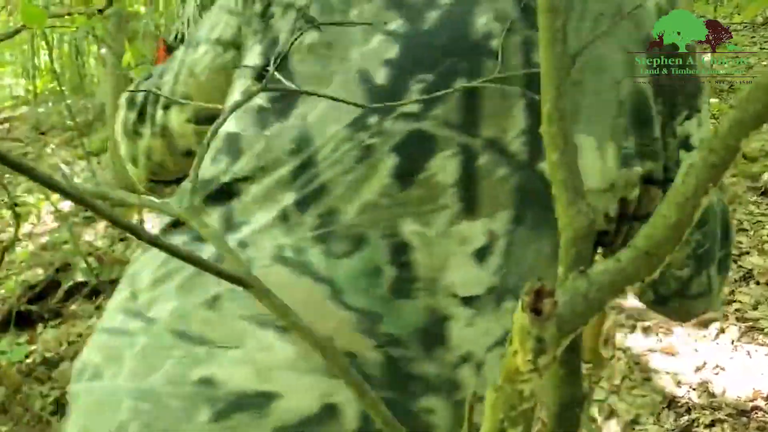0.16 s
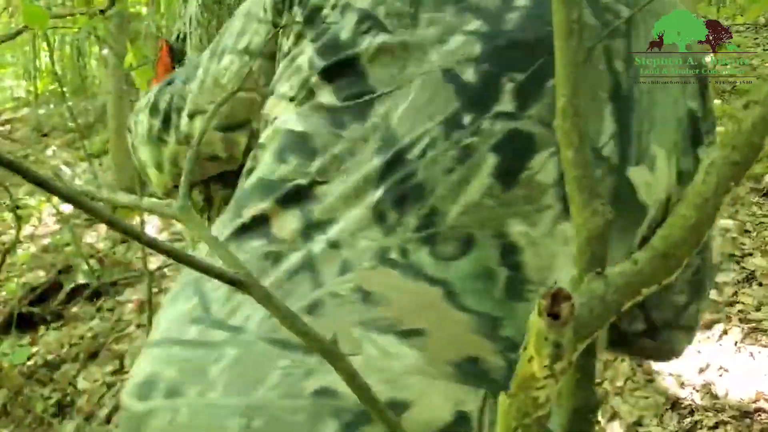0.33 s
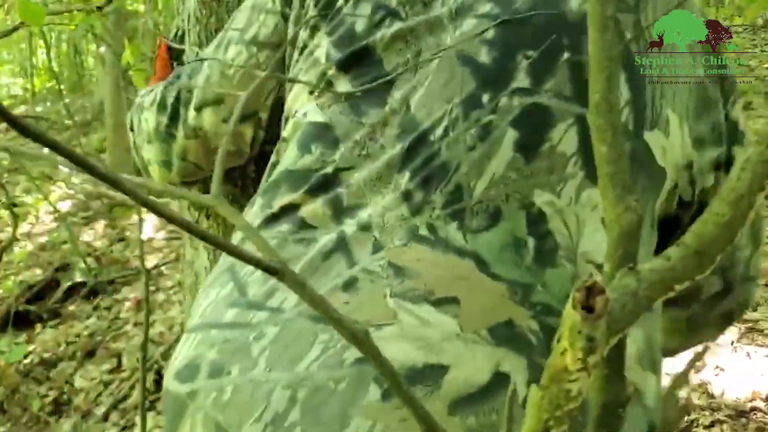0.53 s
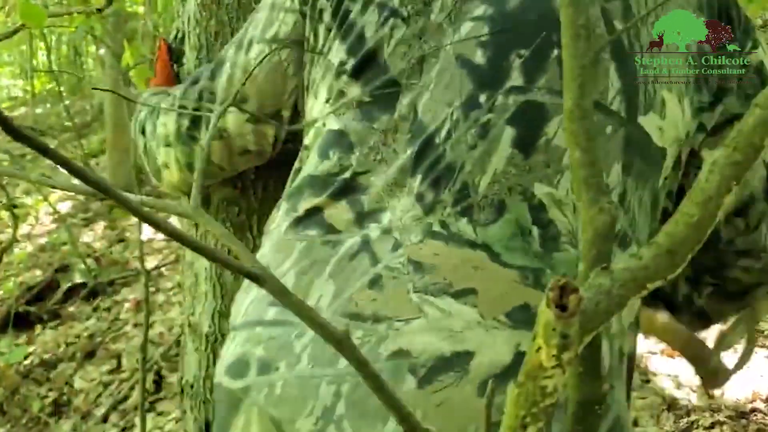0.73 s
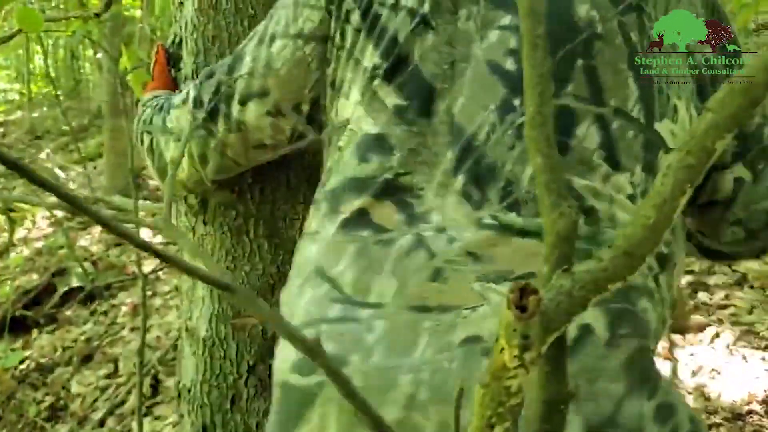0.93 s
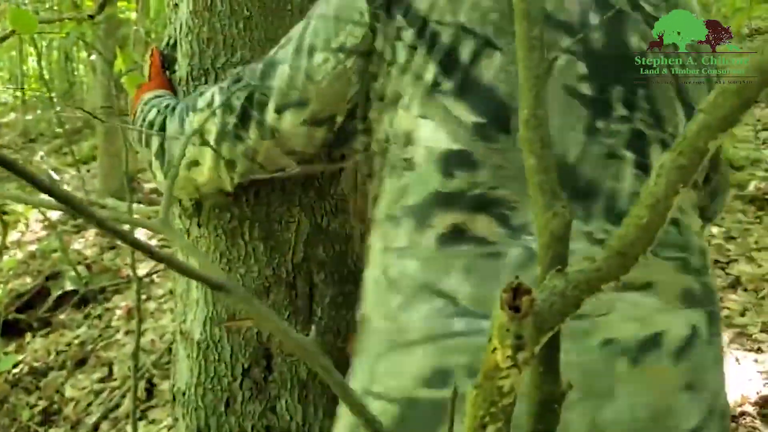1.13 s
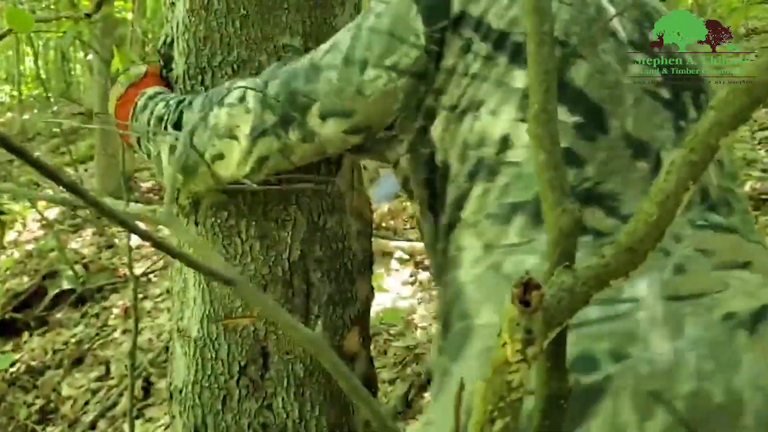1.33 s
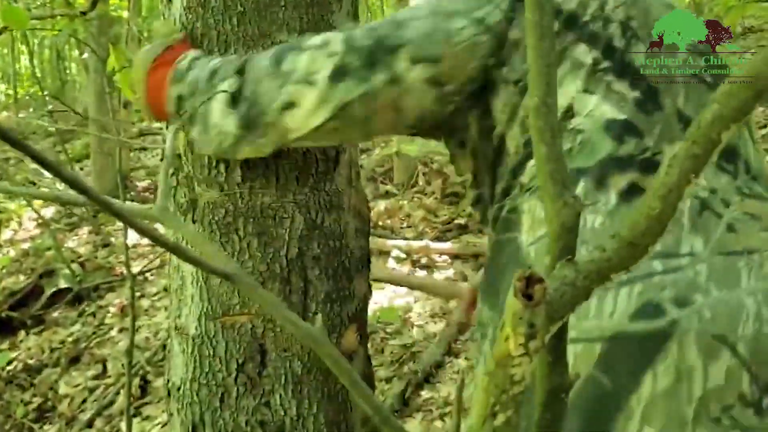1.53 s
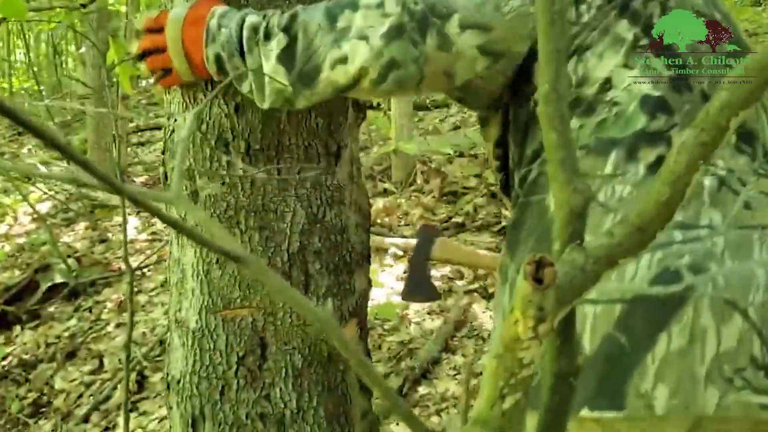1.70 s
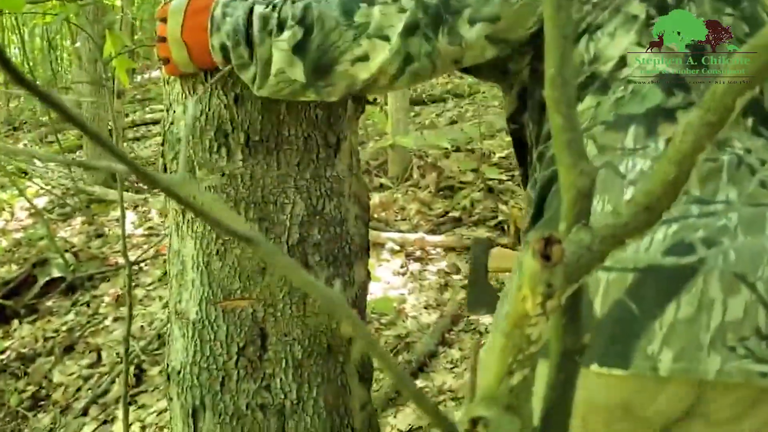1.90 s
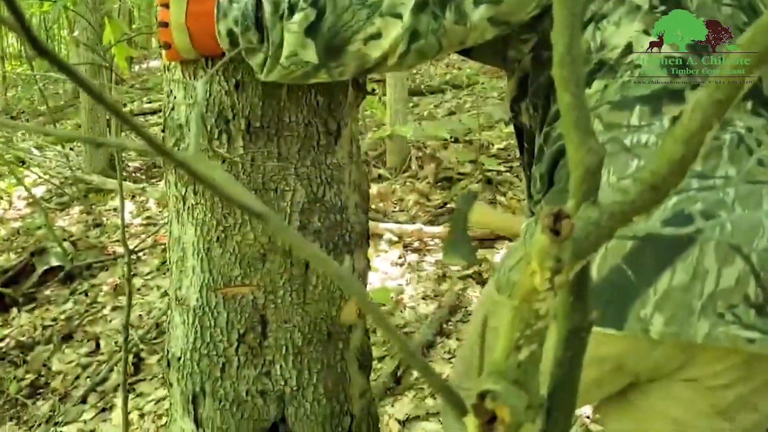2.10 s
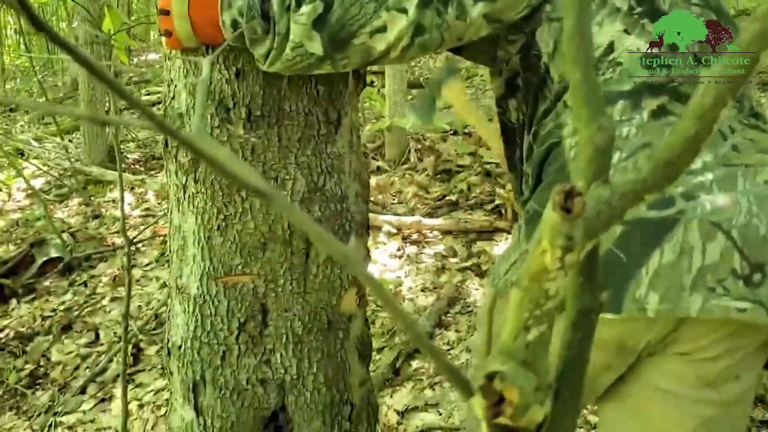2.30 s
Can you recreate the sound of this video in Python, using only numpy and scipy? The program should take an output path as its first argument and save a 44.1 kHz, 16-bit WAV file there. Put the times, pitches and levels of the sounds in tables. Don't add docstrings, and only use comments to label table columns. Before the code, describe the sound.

Hatchet chops into a trunk, slightly right: a splintery blow with a faint steel ring near 0.56 s, and a harder, tighter woody crack near 1.54 s, each with a low thump and short woodland echo. Dry leaves crackle underfoot, snapping sharply around 0.7 s, thinning near 1 s, flaring at 1.2 and 1.9-2.1 s, then fading. A dull wood knock comes at 1.42 s over faint forest hiss.

```python
import sys
import numpy as np
from scipy import signal
from scipy.fft import rfft, irfft, next_fast_len
from scipy.io import wavfile
from scipy.ndimage import uniform_filter1d, map_coordinates

SR = 44100
rng = np.random.default_rng(int(sys.argv[2]) if len(sys.argv) > 2 else 0)


def rack_gain(trim_db):
    fader = np.asarray(trim_db, float)
    return 10 ** (fader / 20)


def digitize_waveform(pressure):
    field = np.atleast_2d(pressure).T
    bounded = np.clip(field, -1, 1)
    quanta = np.round(bounded * 32767).astype(np.int16)
    wavfile.write(sys.argv[1], SR, quanta)


N = 103635


def unit(x):
    return x / np.sqrt(np.mean(x ** 2) + 1e-20)


def along(points, hz):
    f, v = np.transpose(points)
    return np.interp(np.log(hz + 1), np.log(f + 1), v)


def wobble(rate):
    knots = rng.standard_normal(int(N * rate / SR) + 4)
    return map_coordinates(knots, [np.arange(N) * rate / SR])


def noise():
    return rng.standard_normal((2, N))


def filtered(x, response):
    m = next_fast_len(N + 8192)
    return irfft(rfft(x, m) * response(np.fft.rfftfreq(m, 1 / SR)), m)[..., :N]


def spread(pair, spectrum):
    # (f/Hz, correlation/1)
    likeness = [(60, 0.7), (180, 0.97), (550, 0.86), (1650, 0.12), (4970, 0.16), (15000, -0.19)]

    def mid_side(hz):
        turn = np.arccos(np.clip(along(likeness, hz), 0, 1)) / 2
        return rack_gain(along(spectrum, hz)) * [np.cos(turn), np.sin(turn)]

    mid, side = filtered(pair, mid_side)
    return unit(np.array([mid + side, mid - side]))


def add(track, s, sound):
    part = track[..., round(s * SR):][..., :sound.shape[-1]]
    part += sound[..., :part.shape[-1]]


def onset(t, rise_s):
    return 1 - np.exp(-t / rise_s)


def ring(t, hz, t60, rise_s):
    return np.sin(2 * np.pi * hz * t) * rack_gain(-60 * t / t60) * onset(t, rise_s)


def swells(rows):
    t = np.arange(N) / SR
    gain = 0
    for at, db, rise, fall in rows:
        slope_db = np.where(t < at, 20 * (t - at) / rise, -60 * (t - at) / fall)
        gain = gain + rack_gain(db + slope_db)
    return gain


def forest_air():
    # (f/Hz, density/dB)
    air_colour = [(24, -39.5), (40, 0), (802, -29), (909, -11), (1460, -27), (3010, 10), (5490, -25),
                  (14500, -16), (15700, 6)]
    return rack_gain(-66 + 1.6 * wobble(15.0)) * spread(noise(), air_colour)


def cracks():
    grains_per_s, spread_db, grain_db, patch_db = 2500, 6.5, -3.5, 2.13
    draw = rng.random((2, N, 2))
    strength = rack_gain(-spread_db * np.log(draw[..., 1] + 0.015))
    starts = (draw[..., 0] < grains_per_s / SR) * strength
    grains = signal.lfilter([1], [1, -.9], starts) * noise()
    z = signal.stft(noise() + rack_gain(grain_db) * unit(grains), nperseg=256)[2]
    patches = uniform_filter1d(rng.standard_normal(z.shape[1:]), size=4, axis=0)
    patches = uniform_filter1d(patches, size=8, axis=1)
    return signal.istft(z * rack_gain(patch_db * unit(patches)), nperseg=256)[1][:, :N]


def leaves():
    # (t/s, leaf strength/dB, weight on the ground/dB, crispness/dB)
    shuffle = [(0, -36.5, -1, 2.5), (0.329, -32, -1, -12), (.41, -25.5, -3, 3.5), (.46, -38, 2.5, 2.5),
               (.57, -24.5, -3, -1.5), (.62, -31.5, -4.5, -2), (.72, -33.5, -6.5, -3),
               (0.821, -45, -5.5, -5), (1.168, -50.5, 2, -2), (1.199, -22.5, 2.5, -3.5),
               (1.339, -34, -2, -2.5), (1.56, -27.5, -3, -4), (1.71, -32.5, -3.5, -2), (1.88, -29, 2, 1),
               (2.001, -23, -5.5, -2), (2.142, -41, 3, -3), (2.23, -44, -3, -1.5), (2.31, -52.5, -1.5, -8)]
    # (t/s, level/dB, rise/s, fall t60/s)
    crushes = [(.15, -30, 0.005, 0.027), (0.21, -30.5, 0.02, 0.12), (.41, -44, 0.016, 0.097),
               (0.66, -28.5, 0.012, 0.19), (0.713, -24, 0.0023, 0.035), (0.748, -27.5, 0.0024, 0.043),
               (1.2, -30.5, 0.0069, 0.28), (1.235, -40, 0.0024, 0.033), (1.298, -36, 0.0058, 0.034),
               (1.627, -55, 0.0044, 0.038), (1.915, -37, 0.0058, 0.13), (2.205, -36.5, 0.0043, 0.074),
               (2.231, -33.5, 0.0059, 0.14), (2.34, -34.5, 0.0091, 0.16)]
    # (t/s, level/dB, rise/s, fall t60/s)
    booms = [
        (.12, -66, 0.074, 0.82),
        (.46, -48, .04, 0.33),
        (.57, -34.5, 0.027, 0.4),
        (.76, -52, 0.057, 0.15),
        (1.23, -40.5, 0.024, 0.44),
        (1.44, -39.5, 0.025, 0.12),
        (1.55, -32.5, 0.012, 0.35),
        (1.66, -51, .05, 0.39),
        (1.97, -55, .08, 0.5),
    ]
    # (f/Hz, density/dB)
    leaf_colour = [(470, -15), (800, -15), (1270, -5.5), (1800, 0.5), (3430, -4), (6000, -4.5),
                   (10500, -10.5), (13500, -2), (15800, -7)]
    crisp_colour = [(2500, -19), (4000, -8.5), (6000, 7), (10000, 1), (12500, -11)]
    ground_colour = [(65, -32), (110, -5.5), (130, -7.5), (247, -1), (446, -4), (1500, -3), (1950, -5.5),
                     (3300, -120)]
    soil_colour = [(22, -60), (38, -11), (55, -1.5), (95, -6), (140, -12.5), (220, -25), (400, -72)]
    # (level/dB, level/dB)
    feet_pan_db = (1, -1)

    s, *cols = np.transpose(shuffle)
    strength_db, weight_db, crisp_db = (np.interp(np.arange(N) / SR, s, c) for c in cols)
    gain = rack_gain(strength_db + 0.23 * wobble(29.83) + 1.06 * wobble(220)) + swells(crushes)
    crackle = spread(cracks(), leaf_colour) + rack_gain(-7.5 + crisp_db) * spread(cracks(), crisp_colour)
    ground = spread(noise() * rack_gain(2 * wobble(39.78)), ground_colour)
    soil = unit(filtered(rng.standard_normal(N), lambda hz: rack_gain(along(soil_colour, hz))))
    boom = (swells(booms) + rack_gain(-66)) * soil
    pan_db = np.linspace(*feet_pan_db, N) * np.array([[.5], [-.5]])
    return gain * (crackle * rack_gain(pan_db) + rack_gain(-9 + weight_db) * ground) + boom


def ribs():
    # (t/s, peak level/dB, t60/s)
    ticks = [(0.043, -17, 0.013), (0.1256, -22, 0.013), (0.2618, -26, 0.013), (0.3306, -17, 0.013),
             (0.3845, -14, 0.016), (0.402, -15, 0.014), (0.4145, -9, 0.013), (0.5214, -14, 0.013),
             (0.7134, -6, 0.013), (0.7458, -10, 0.012), (0.7811, -22, 0.015), (0.7927, -27, 0.013),
             (1.1837, -23, 0.013), (1.215, -6, 0.0086), (1.5628, -6.5, 0.012), (1.6777, -18, 0.011),
             (1.808, -18, 0.013), (1.8422, -14, 0.015), (1.9126, -7, 0.013), (1.9444, -9, 0.015),
             (1.9764, -19, 0.013), (1.9974, -13, 0.013), (2.0064, -16, 0.013), (2.0394, -27, 0.013),
             (2.0654, -9.5, 0.016), (2.0749, -9, 0.017), (2.099, -15, 0.013), (2.2054, -19, 0.013),
             (2.224, -17, 0.013), (2.235, -27, 0.013), (2.3351, -34, 0.013)]
    # (f/Hz, density/dB)
    rib_colour = [(2000, -14), (5000, -20), (9000, -3), (13500, -9), (15800, 4)]
    gain = np.zeros(N)
    for s, db, t60 in ticks:
        since = np.maximum(np.arange(N) / SR - s, 0)
        gain += rack_gain(db - 2.5 - 60 * since / t60) * onset(since, .0006)
    return gain * spread(noise(), rib_colour)


def twigs():
    # (t/s, peak level/dB, f/Hz, fizz/dB)
    snaps = [(.149, -24, 1970, 6), (.415, -14, 1570, 17), (0.507, -17, 1560, 19), (0.66, -17, 2080, -10),
             (0.731, -2, 3600, -8), (.749, -15, 2600, 8), (.718, -14, 3000, -4), (.782, -30, 1710, 0),
             (.789, -28, 1600, 0), (.803, -28.5, 1180, 9), (.81, -18, 5000, -5), (.834, -27, 2310, 0),
             (.865, -33, 1786, 13), (1.014, -51, 1140, 21), (1.032, -40, 1470, 20), (1.062, -28.5, 1350, 8),
             (1.075, -21.5, 1440, 7), (1.104, -32, 3190, 13), (1.112, -30, 2200, 2), (1.153, -32, 2510, 19),
             (1.163, -36, 2980, 16), (1.177, -20, 1140, 5), (1.2, -6.5, 1910, -13), (1.234, -12, 1110, 18),
             (1.343, -28, 2090, 20), (1.443, -15.5, 3000, 12), (1.527, -17, 2200, -5),
             (1.627, -12.5, 1960, 7), (1.808, -16, 1880, 11), (2.03, -12, 1640, -6), (2.1, -18, 1910, 0),
             (2.118, -22.5, 1780, -5), (2.225, -20, 2120, -4), (2.339, -22, 1690, -3)]
    rise_s, lag_s, fizz_t60 = 0.00022, .0013, 0.0066
    out, t = np.zeros((2, N)), np.arange(SR // 20) / SR
    for s, db, hz, fizz_db in snaps:
        bright = np.diff(rng.standard_normal((2, len(t) + 2)), 2)
        fizz = bright * rack_gain(fizz_db - 17.5 - 60 * t / fizz_t60) * onset(t, rise_s)
        add(out, s + lag_s, rack_gain(db) * (ring(t, hz, 7 / hz, rise_s) + fizz))
    return out


def knocks():
    # (t/s, peak level/dB, thud f/Hz, click/dB, tick/dB)
    knock_rows = [
        (.547, -21.5, 203, 0, -21),
        (1.255, -22, 244, 4, -12),
        (1.299, -19.5, 302, 4.5, -21),
        (1.418, -13, 278, 4.5, -0.5),
        (1.752, -23, 338, 6.5, 1.5),
        (2.066, -16, 338, 8, -16),
    ]
    thud_t60, tick_hz, tick_lead_s = 0.02, 4470, .0012
    out, t = np.zeros((2, N)), np.arange(SR // 20) / SR
    for s, db, hz, click_db, tick_db in knock_rows:
        thud = ring(t, hz, thud_t60, 0.00075) + 0.5 * ring(t, 1.514 * hz, thud_t60, 0.00056)
        click = rack_gain(click_db) * ring(t, 1243, 0.0083, 0.00049)
        tick = sum(ring(t, tick_hz * k, 0.0053, 0.00039) for k in (.7, .9, 1.15, 1.35))
        add(out, s, -rack_gain(db) * (thud + click))
        add(out, s - tick_lead_s, rack_gain(db + tick_db) * tick)
    return out


def echo(x):
    # (f/Hz, t60/s)
    woods = [(200, 0.091), (2000, 0.06), (6000, 0.34), (14000, 0.082)]
    mono_hz = 500
    hz, t, z = signal.stft(rng.standard_normal((2, SR // 2)), SR, nperseg=128)
    tail = signal.istft(z * rack_gain(-60 * t / along(woods, hz)[:, None]), SR, nperseg=128)[1]
    side = signal.lfilter(*signal.butter(2, mono_hz, 'high', fs=SR), tail[0] - tail[1]) / 2
    tail = tail.mean(axis=0) + np.array([side, -side])
    return signal.fftconvolve(x, tail / np.linalg.norm(tail[0]), axes=1)


def trunk_thump(t):
    # (f/Hz, level/dB, t60/s)
    trunk = [(136, 4.5, 0.04), (189, -6.5, 0.088), (286, 0, 0.013), (458, -11, 0.013)]
    sag, sag_s, rise_s = 0.38, 0.0043, 0.0034
    bent = t + sag * sag_s * onset(t, sag_s)
    return sum(rack_gain(level) * ring(bent, hz, t60, rise_s) for hz, level, t60 in trunk)


def hatchet():
    # (t/s, level/dB, bite/s, thump/dB, splinters/dB, echo/dB)
    chops = [
        (0.5575, -9.5, 0.0062, -13, -12.5, -21),
        (1.5364, -6.5, 0.003, -14, -17.5, -23),
    ]
    # (f/Hz, level/dB, t60/s)
    cuts = [
        [(1246, -0.5, 0.0082), (1604, -6, 0.0038), (2930, -2.5, 0.0064), (615, -12, 0.0033), (904, -9, 0.006),
         (5020, -8, 0.036), (5395, -10.5, 0.045), (5710, -13, 0.021), (9710, -21, 0.033)],
        [(2200, 2.5, 0.01), (2510, -7.5, 0.016), (2865, -5, 0.018), (1030, -9.5, 0.022), (3396, -10.5, 0.019),
         (530, -14, 0.022), (5670, -14.5, 0.019)],
    ]
    bark_db = (0, -3)
    bite_rise_s, splinter_t60, bark_hz, bark_t60 = 0.0009, 0.013, 2600, 0.042
    waver = .085
    thump_lag_s, echo_lag_s = .0056, 0.0028

    out, t = np.zeros((2, N)), np.arange(SR // 4) / SR
    for (s, db, bite_s, thump_db, splinter_db, echo_db), modes, crush_db in zip(chops, cuts, bark_db):
        after = np.maximum(t - bite_s, 0)
        unsteady = rng.standard_normal((len(modes), len(t))) * np.where(t < bite_s, 1, .4)
        slips = waver * np.cumsum(unsteady, axis=1)
        cut = np.zeros(len(t))
        for (hz, level, t60), slip in zip(modes, slips):
            cut += rack_gain(level - 60 * after / t60) * np.sin(2 * np.pi * hz * t + slip)
        bark = signal.lfilter(*signal.butter(2, bark_hz, fs=SR), rng.standard_normal(len(t)))
        bark = bark * rack_gain(crush_db - 60 * after / bark_t60)
        splinters = rack_gain(splinter_db - 60 * after / splinter_t60) * rng.standard_normal((2, len(t)))
        blow = onset(t, bite_rise_s) * (rack_gain(db) * (cut + bark) + splinters)
        add(out, s, blow)
        add(out, s + thump_lag_s, rack_gain(thump_db) * trunk_thump(t))
        add(out, s + echo_lag_s, rack_gain(echo_db + 14.0) * echo(blow))
    return out


def scene():
    return forest_air() + leaves() + ribs() + twigs() + knocks() + hatchet()


def starved(x):
    # (t/s, length/s, f/Hz)
    holes = [(0, .05, 4300), (0, .04, 3000), (1.26, .09, 4700), (1.34, .03, 2950), (1.34, .04, 3500),
             (1.34, .03, 4000), (1.36, .04, 7450), (1.51, .02, 5300), (1.58, .1, 4320), (2.11, .085, 4750),
             (2.22, .05, 3520), (2.255, .03, 4300), (.76, .04, 7400)]
    half_width_hz, depth_db = 90, -22
    hz, t, z = signal.stft(x, SR, nperseg=1024, noverlap=768)
    missing = 0
    for s, length, at_hz in holes:
        missing = missing + np.outer(abs(hz - at_hz) < half_width_hz, (t > s) & (t < s + length))
    return signal.istft(z * rack_gain(depth_db * missing), SR, nperseg=1024, noverlap=768)[1][:, :N]


def low_pass(x):
    return signal.sosfilt(signal.butter(12, 15830, fs=SR, output="sos"), x)


def record(dry):
    # (f/Hz, level/dB)
    lean = [(60, -1.5), (150, 0), (380, 0.5), (950, -6.5), (2380, -6.5), (5980, -0.5), (15000, -11)]
    low_cut_hz, top_hz = 36, 15830

    def ports(hz):
        balance = rack_gain(along(lean, hz) * np.array([[.5], [-.5]]))
        return balance * (hz < top_hz) / (1 + (low_cut_hz / (hz + 1)) ** 4)

    x = filtered(dry, ports)
    x = x / (1 + np.abs(x) ** 8) ** (1 / 8)
    mix = starved(x)
    return low_pass(mix)


dry = scene()
out = record(dry)
digitize_waveform(out)
```